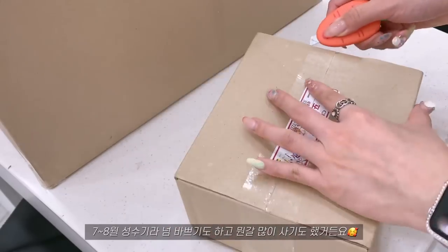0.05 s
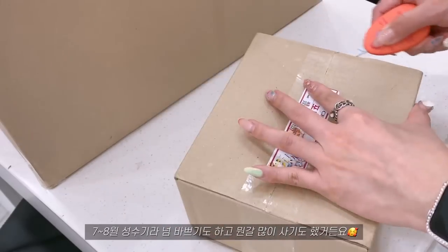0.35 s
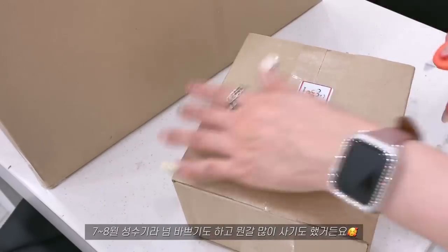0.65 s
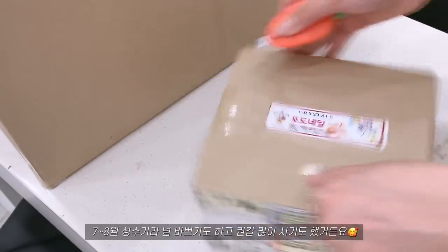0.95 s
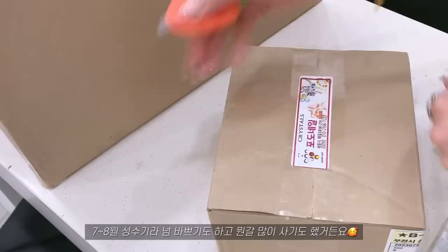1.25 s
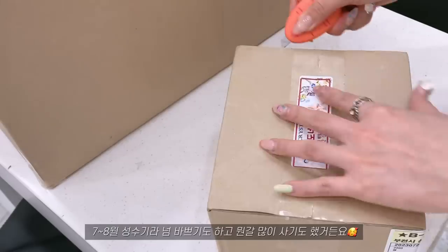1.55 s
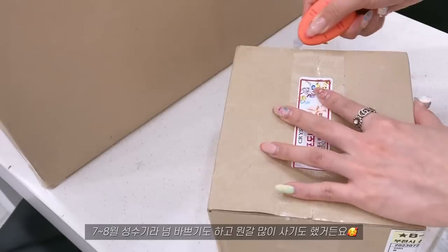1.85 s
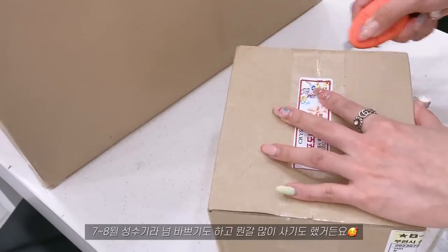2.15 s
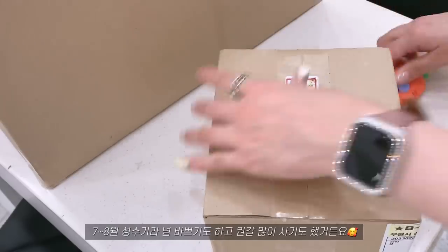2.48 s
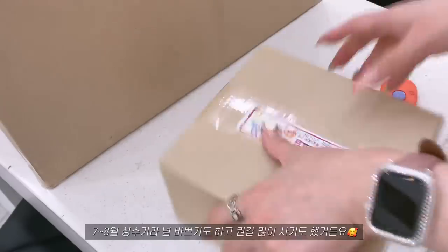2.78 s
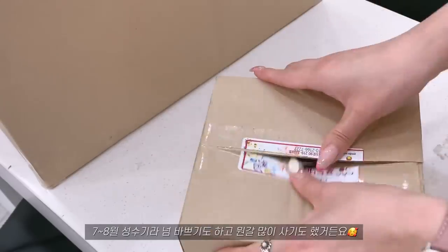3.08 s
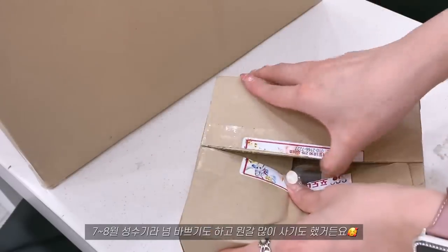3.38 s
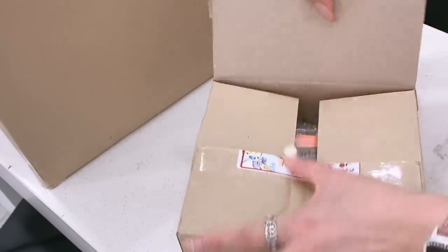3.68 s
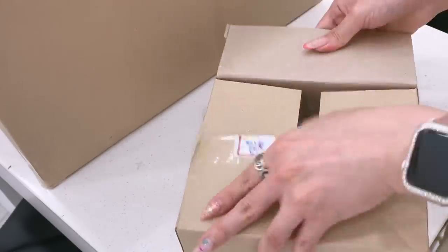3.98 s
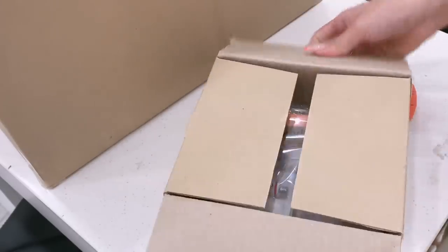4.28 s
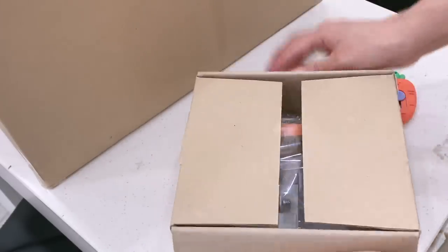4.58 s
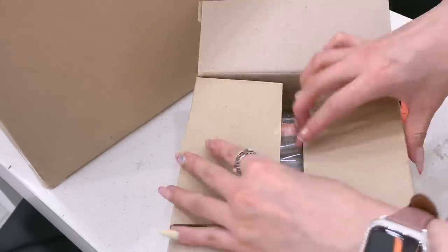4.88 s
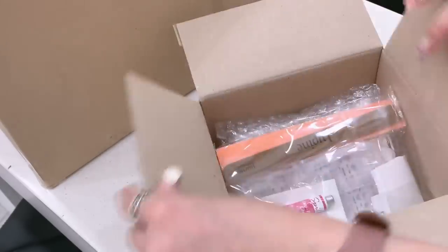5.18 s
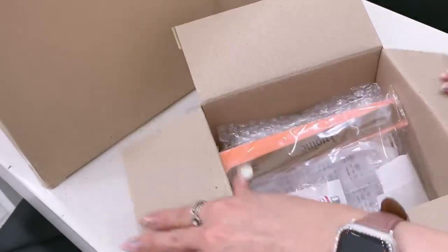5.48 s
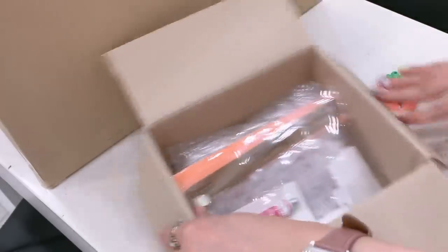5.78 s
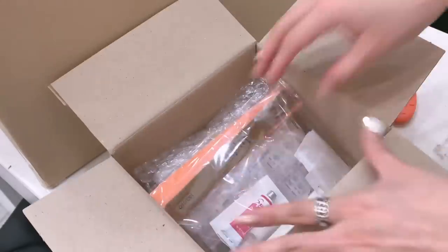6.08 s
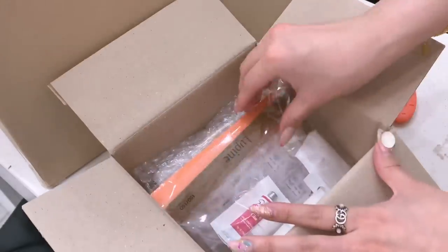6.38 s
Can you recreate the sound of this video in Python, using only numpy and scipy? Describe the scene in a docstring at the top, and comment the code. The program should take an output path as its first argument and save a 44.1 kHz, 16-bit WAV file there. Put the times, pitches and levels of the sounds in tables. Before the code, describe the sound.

Close, dry sounds of a parcel being opened: tape sawed, a blade clicking back, cardboard sliding and knocking, then crinkling plastic.

```python
"""A small cardboard parcel is opened on a table, close to the microphone, in a dry room.
First a box cutter saws through the tape at one end, then at the other, rasping while the box drones.
Just after two seconds its blade clicks back in. Next the box is turned and slid, and the last tape snaps.
Then the flaps knock and scrape, and at about six seconds fingers crinkle the plastic bag inside."""
import sys
import numpy as np
from scipy import signal
from scipy.fft import rfft, irfft, next_fast_len
from scipy.io import wavfile
from scipy.ndimage import uniform_filter1d, map_coordinates

SR = 44100
rng = np.random.default_rng(int(sys.argv[2]) if len(sys.argv) > 2 else 0)


def transcribe(signal):
    """Save signal, clipped to [-1, 1], as a 16-bit WAV file at the path in sys.argv[1]."""
    frames = np.atleast_2d(signal).T
    limited = np.clip(frames, -1, 1)
    pcm = np.round(limited * 32767).astype(np.int16)
    wavfile.write(sys.argv[1], SR, pcm)


N = 288502
TOP_HZ = 16000  # highest frequency kept
HIT_T = np.arange(SR // 6) / SR  # seconds since the start of one short hit


def amp(db):
    """Turn decibels into a number to multiply by."""
    return 10 ** (np.asarray(db) / 20)


def unit(x):
    """Give a sound an average strength (rms) of 1."""
    return x / np.sqrt(np.mean(x ** 2) + 1e-20)


def pulse(x):
    """Give a hit the energy of 10 ms of sound at strength 1."""
    return x * np.sqrt(SR / 100 / (np.sum(x ** 2) + 1e-20))


def along(points, hz):
    """Read between (frequency, value) points, with octaves evenly spaced."""
    freqs, values = np.transpose(points)
    return np.interp(np.log(hz + 1), np.log(freqs + 1), values)


def add(track, start, sound):
    """Mix a sound into the track, start seconds in."""
    part = track[max(round(start * SR), 0):][:len(sound)]
    part += sound[:len(part)]


def wobble(rate):
    """A smooth random curve through rate points a second."""
    return map_coordinates(rng.standard_normal(int(N * rate / SR) + 4), [np.arange(N) * rate / SR])


def coloured(x, tone):
    """Make each frequency louder or softer, following a tone table of f/Hz, level/dB."""
    size = 2 * next_fast_len(len(x) // 2 + 2048)
    gain = amp(along(tone, np.fft.rfftfreq(size, 1 / SR)))
    # fold the filter so that it rings only after a hit, never before
    cepstrum = irfft(np.log(gain + 1e-6))
    cepstrum[1:size // 2] *= 2
    cepstrum[size // 2 + 1:] = 0
    return irfft(rfft(x, size) * np.exp(rfft(cepstrum)), size)[:len(x)]


def patchy(x, depth_db):
    """Patches of pitch come and go as the touching point moves."""
    spectrum = signal.stft(x, nperseg=1024)[2]
    patches = uniform_filter1d(rng.standard_normal(spectrum.shape), size=5, axis=0)
    patches = uniform_filter1d(patches, size=6, axis=1)
    return signal.istft(spectrum * amp(depth_db * unit(patches)), nperseg=1024)[1][:N]


def slips(rate, spread_db, clump_db, clump_rate, smooth):
    """Friction: clumps of tiny, uneven slips over a smooth rub. Rates are per second."""
    sizes = amp(spread_db * np.clip(rng.standard_normal(N), -2, 2)) * rng.choice([-1, 1], N)
    grains = unit(sizes * (rng.random(N) < rate / SR))
    force = grains + smooth * rng.standard_normal(N)
    return unit(force * amp(clump_db * np.clip(wobble(clump_rate), -2, 2)))


def pings(count, low_hz, high_hz, cycles, spread_db):
    """Tiny buckles at random times, each ringing for a few cycles at its own pitch."""
    when, pitch, size, phase = rng.random((count, 4)).T[:, :, None]
    hz = low_hz * (high_hz / low_hz) ** pitch
    n = np.arange(min(int(3 * cycles * SR / low_hz), 1500))
    turns = hz * n / SR
    strength = amp(spread_db * size ** 3) * hz
    rings = strength * np.sin(2 * np.pi * (turns + phase)) * np.exp(-turns / cycles)
    places = (when * N).astype(int) + n
    return unit(np.bincount(places.ravel(), rings.ravel(), N)[:N])


def burst(fade_s, rise_s, tone):
    """A short crack of noise that falls 60 dB in fade_s; each one has a slightly different tone."""
    envelope = amp(-60 * HIT_T / fade_s) * (1 - np.exp(-HIT_T / rise_s)) ** 2
    hz = np.geomspace(100, TOP_HZ, 48)
    tone_db = along(tone, hz) + 3.5 * np.clip(rng.standard_normal(len(hz)), -2, 2)
    noise = rng.standard_normal(len(HIT_T)) * envelope
    return pulse(coloured(noise, np.transpose([hz, tone_db])))


def strokes(rows, swell_share, drift_db_per_s, fade_lengths):
    """One loudness curve per level column: each stroke swells, drifts, then fades away."""
    t, power = np.arange(N) / SR, 0
    for start, length, *levels_db in rows:
        age = np.maximum(t - start, 0)
        swell = np.sin(np.pi / 2 * np.minimum(age / (swell_share * length), 1)) ** 2
        drift_db = drift_db_per_s * np.minimum(age, length)
        fall_db = -60 * np.maximum(age - length, 0) / (fade_lengths * length)
        power = power + (amp(levels_db)[:, None] * swell * amp(drift_db + fall_db)) ** 2
    return np.sqrt(power)


# tones of the quiet room and of the draught: f/Hz, level/dB
STILL_TONE = [(35, -25.5), (60, -13.5), (130, -21.5), (207, -15.5), (323, -25.5), (1410, -34.5),
              (1740, -38.5), (9790, -47), (14200, -57), (16000, -74)]
DRAUGHT_TONE = [(1, -6), (3, -11), (8, -2), (16, -25.5), (30, -23.5), (60, -32), (120, -63), (300, -84.5)]
def air():
    """Faint room noise, and a slow draught that sways the microphone."""
    still = amp(-55) * unit(coloured(rng.standard_normal(N), STILL_TONE))
    draught = amp(-28.5) * unit(coloured(rng.standard_normal(N), DRAUGHT_TONE))
    return still + draught


# how long the room's echo lasts: f/Hz, time to fall 60 dB/s
ECHO_TIMES = [(150, 0.4), (1000, 0.51), (5000, 0.18), (14000, 0.18)]
def room(x):
    """The walls send back a short, soft echo whose high notes die first."""
    hz, t, noise = signal.stft(rng.standard_normal(SR // 2), SR, nperseg=256)
    fade = amp(-60 * t / along(ECHO_TIMES, hz)[:, None])
    tail = signal.istft(noise * fade, SR, nperseg=256)[1]
    delayed_tail = np.pad(tail / np.linalg.norm(tail), (round(0.0045 * SR), 0))
    return signal.fftconvolve(x, delayed_tail)[:N]


# the whole box bumps the table: t/s, level/dB
LANDINGS = [(2.477, -17), (3.51, -25.5), (4.146, -6.5)]
def bumps():
    """A soft landing gives one low push of air, with no ring."""
    out = np.zeros(N)
    age = HIT_T / 0.0044  # counted in steps of 4.4 ms
    for start, db in LANDINGS:
        add(out, start, amp(db) * age * (age - 2) * np.exp(-age))
    return out


# hands, flaps and the box's bottom drag: t/s, length/s, drone level/dB, scrape level/dB, hiss level/dB
DRAGS = [(0.39, 0.12, -48, -61, -54.5), (0.68, 0.17, -45.5, -53, -45.5), (0.83, .12, -47, -49.5, -43.5),
         (0.98, .075, -54, -55, -40), (1.47, 0.13, -57, -66, -62.5), (2.19, 0.052, -48, -45, -53),
         (2.41, 0.23, -46, -43, -48), (2.63, 0.26, -37.5, -48.5, -48), (2.98, 0.12, -35, -34.5, -42),
         (3.22, 0.14, -38, -46, -55), (3.475, .12, -34.5, -37.5, -44.5), (3.63, .06, -34.5, -35.5, -40),
         (3.7, 0.22, -37.5, -39, -45), (3.92, 0.17, -47, -47.5, -44.5), (4.1, 0.15, -36, -37, -39),
         (4.34, 0.073, -41, -47, -53), (4.49, 0.1, -49.5, -50, -48.5), (4.77, 0.3, -44.5, -47.5, -49),
         (5.12, 0.24, -43, -49, -50.5), (5.28, 0.045, -39, -46, -38), (5.38, 0.25, -48.5, -47.5, -52),
         (5.65, 0.16, -48.5, -43.5, -45.5), (5.94, 0.27, -49, -52.5, -49.5)]
# tones of the droning box, its scraping edges and its hissing fibres: f/Hz, level/dB
BOX_TONE = [(47, -56), (80, -12), (117, -2), (172, -8.5), (248, -2.5), (292, -7), (489, -7.5), (672, -6),
            (933, -13.5), (1100, -11.5), (1430, -45), (2420, -120)]
SCRAPE_TONE = [(350, -8), (600, -7), (671, -1), (926, -2), (1070, -8), (1690, -8.5), (1970, -14),
               (3200, -21), (4160, -73), (7040, -120)]
HISS_TONE = [(1180, -23), (2000, -2.5), (2490, 3.5), (3010, -9), (3310, 1), (5120, 0.5), (6360, 1.5),
             (10500, -0.5), (14300, -6), (16000, -7)]
def rubbing():
    """Cardboard drags on the table, on skin and on itself: its walls creak and fine fibres hiss."""
    drone, scrape, hiss = strokes(DRAGS, swell_share=0.22, drift_db_per_s=-7.5, fade_lengths=3)
    coarse = slips(rate=550, spread_db=6.5, clump_db=6, clump_rate=60, smooth=0.86)
    fine = slips(rate=4500, spread_db=1.5, clump_db=3, clump_rate=60, smooth=1.15)
    creaks = pings(count=1300, low_hz=98.5, high_hz=814, cycles=4.6, spread_db=13)
    walls = unit(unit(coloured(creaks, BOX_TONE)) + 0.84 * unit(coloured(coarse, BOX_TONE)))
    edge = unit(patchy(coloured(coarse, SCRAPE_TONE), depth_db=1.5))
    fibres = unit(patchy(coloured(fine, HISS_TONE), depth_db=2.9))
    return drone * walls + scrape * edge + hiss * fibres


# short squeaks: middle t/s, length/s, f/Hz, level/dB
SQUEAKS = [(0.325, 0.012, 4200, -38), (0.355, 0.0096, 480, -21), (0.386, 0.022, 417, -40),
           (2.112, 0.017, 5140, -39.5), (2.169, 0.016, 454, -32.5), (2.485, 0.017, 4620, -38.5),
           (2.563, 0.0091, 1260, -33), (2.688, 0.0056, 1620, -31.5), (2.69, 0.042, 500, -31.5),
           (2.843, 0.036, 1290, -35.5), (4.22, .024, 665, -28.5), (4.6, 0.025, 876, -33.5),
           (4.808, 0.023, 643, -32), (4.907, 0.02, 646, -28.5), (5.163, 0.011, 143, -35),
           (5.222, 0.028, 1230, -39), (5.312, 0.016, 1080, -32.5), (5.316, 0.021, 148, -33),
           (5.714, 0.05, 1590, -42), (5.821, 0.0086, 1097, -29.5), (6.156, 0.031, 430, -34.5)]
def squeaks():
    """A sticking edge slips, swelling and fading around one pitch over a soft hiss of fibres."""
    out, t = np.zeros(N), np.arange(N) / SR
    force = slips(rate=1400, spread_db=4, clump_db=1.8, clump_rate=220, smooth=0.6)
    for middle, length, hz, db in SQUEAKS:
        near = np.abs(t - middle) < 2 * length
        swell = np.exp(-2 * ((t[near] - middle) / length) ** 2)
        tone = [(hz / 4, -30), (hz / 2.05, -12), (hz, 0), (hz * 1.21, -10), (hz * 3, -24), (hz * 9, -55)]
        squeak = unit(coloured(force[near], tone))
        hiss = amp(-21.5) * unit(coloured(force[near], HISS_TONE))
        out[near] += amp(db) * swell * (squeak + hiss)
    return out


# fingers grab the bag: t/s, length/s, drone level/dB, crinkle level/dB
BAG_GRABS = [(6.115, 0.049, -37, -36), (6.22, 0.09, -41.5, -37.5), (6.39, 0.16, -40, -41.5)]
# creases in the tape and the bag flip over: t/s, level/dB
CREASE_SNAPS = [(1.2292, -50.5), (1.412, -58.5), (3.421, -38), (4.261, -40.5), (5.1942, -41.5),
                (5.291, -47), (5.6103, -45.5), (6.125, -34), (6.1848, -29), (6.2781, -30.5), (6.29, -32),
                (6.3107, -40), (6.326, -33), (6.3622, -31.5), (6.4144, -34.5), (6.4241, -30.5),
                (6.51, -32.5), (6.5288, -32)]
# tone of thin plastic: f/Hz, level/dB
PLASTIC_TONE = [(470, -24), (800, -10), (1030, -2.5), (1660, -1.5), (4570, -2.5), (5380, -6.5), (8440, -6),
                (14800, -12.5), (16000, -11.5)]
def plastic():
    """Big creases snap and ring one by one, many small ones rustle, and the bag nudges the box."""
    drone, crinkle = strokes(BAG_GRABS, swell_share=0.15, drift_db_per_s=-6, fade_lengths=4.7)
    crackle = pings(count=9000, low_hz=1200, high_hz=10000, cycles=2.5, spread_db=11)
    force = slips(rate=1300, spread_db=6, clump_db=2.5, clump_rate=90, smooth=0.6)
    rustle = patchy(force, depth_db=2.5)
    out = crinkle * unit(coloured(1.4 * crackle + rustle, PLASTIC_TONE))
    out += drone * unit(coloured(rustle, BOX_TONE))
    ring_shape = amp(-60 * HIT_T / 0.0054) * (1 - np.exp(-HIT_T / 0.00024))
    for start, db in CREASE_SNAPS:
        hz = 4160 * 2 ** (0.47 * rng.standard_normal())  # varies by about half an octave
        ring = pulse(np.sin(2 * np.pi * hz * HIT_T) * ring_shape)
        snap = burst(fade_s=0.014, rise_s=0.00041, tone=PLASTIC_TONE)
        add(out, start, amp(db) * (snap + 0.37 * ring))
    return out


# the cutter's slider jumps over its notches: t/s, level/dB
NOTCHES = [(2.261, -43.5), (2.284, -28.5), (2.2945, -34), (2.3311, -29), (2.349, -35), (2.3897, -35),
           (2.413, -30.5), (2.4223, -32), (2.554, -40.5)]
# tone of one click: f/Hz, level/dB
CLICK_TONE = [(500, -14), (1300, -5), (2200, 4.5), (3300, -4.5), (5200, -1.5), (9000, -5.5), (15000, -20)]
def ratchet():
    """As the blade slides back in, each notch clicks in the cutter's plastic shell."""
    out = np.zeros(N)
    for start, db in NOTCHES:
        add(out, start, amp(db) * burst(fade_s=0.022, rise_s=0.00025, tone=CLICK_TONE))
    return out


# pulls of the blade through the tape: t/s, length/s, drone level/dB, rasp level/dB
PULLS = [(0.07, 0.16, -39.5, -44.5), (0.22, 0.07, -41.5, -51), (0.3, 0.085, -35.5, -38.5),
         (1.66, 0.377, -42.5, -46.5), (2.03, 0.15, -38.5, -41)]
# the blade snags in the tape: t/s, level/dB
SNAGS = [(0.077, -40), (0.2093, -29), (0.4222, -29.5), (1.656, -48), (1.942, -40), (1.9867, -40.5),
         (2.1127, -43), (2.14, -34)]
# tones of the box being cut, of its grain parting and of a snag: f/Hz, level/dB
CUT_BOX_TONE = [(71, -32), (120, -6.5), (188, -12), (323, -5.5), (481, -6.5), (548, -6.5), (669, -6),
                (920, -22.5), (1150, -12.5), (2000, -56), (2600, -38), (4400, -120)]
RASP_TONE = [(900, -6.5), (1700, 5), (2400, -1.5), (3100, -8.5), (4000, 5), (4800, -2), (5500, 0.5),
             (6200, 1.5), (7000, -6), (7700, 3.5), (8400, -2.5), (9400, -5), (13400, -7.5), (16000, -13)]
SNAG_TONE = [(200, 5), (500, 9), (1200, 4), (2000, -3), (4000, 2.5), (8000, -0.5), (15000, -16)]
def blade():
    """The blade saws through tape in quick slips that rasp at the edge and drone in the box."""
    # each pull grows harder until the blade comes free
    drone, rasp = strokes(PULLS, swell_share=0.18, drift_db_per_s=7, fade_lengths=1)
    force = slips(rate=3000, spread_db=8.5, clump_db=3.5, clump_rate=150, smooth=0.45)
    out = drone * unit(patchy(coloured(force, CUT_BOX_TONE), depth_db=3.5))
    out += rasp * unit(patchy(coloured(force, RASP_TONE), depth_db=2.5))
    for start, db in SNAGS:
        add(out, start, amp(db) * burst(fade_s=0.0086, rise_s=0.00081, tone=SNAG_TONE))
    # a quick bounce off the table top makes the sound slightly hollow
    n = np.arange(N)
    bounce = np.interp(n - 0.000727 * SR, n, out)
    return out + 0.12 * bounce


# knocks and snaps: t/s, ring level/dB, favoured f/Hz, clack and crack level/dB compared with the ring
BOX_HITS = [(0.187, -30.5, 300, -13, -7), (0.312, -25, 345, -20, -16), (0.474, -25, 369, -9, -16.5),
            (0.488, -25, 510, -8, -19.5), (0.706, -20, 320, -10.5, -30), (1.47, -29, 148, 0.5, -18),
            (1.512, -37.5, 530, -12, -6), (2.481, -32, 145, -1, -10), (2.807, -22.5, 465, -10.5, -36),
            (2.837, -28, 320, -4, -31), (2.991, -29.5, 312, -15, -16), (3.021, -19, 259, -11, -14),
            (3.037, -26.5, 267, -8, -8), (3.25, -31.5, 490, -18, -20.5), (3.45, -7.5, 376, -5, -14),
            (3.491, -15, 198, -6, -3), (3.731, -23.5, 534, -8.5, -19.5), (3.773, -47, 270, 14.5, 7.5),
            (3.955, -16, 194, -9, -3.5), (4.111, -26.5, 660, -7.5, -10.5), (4.149, -17.5, 105, -35, -40),
            (4.356, -33.5, 770, -4, -4.5), (4.401, -28, 374, -8.5, -26), (4.757, -36, 102, -9.5, -18),
            (4.803, -21, 247, -23, -25.5), (4.819, -26, 247, -20, -32), (5.012, -25.5, 139, -5, -17.5),
            (5.879, -28.5, 302, -22, -20.5), (6.031, -33, 108, -9.5, -24)]
# notes of the cardboard panels and the air between them: f/Hz, level/dB, time to fall 60 dB/s
PANEL_NOTES = [(83, -19, 0.055), (146, -1, 0.034), (197, -2, 0.018), (256, -3, 0.07), (329, 3.5, 0.077),
               (374, -5.5, 0.2), (486, 9.5, 0.054), (538, -2, 0.14), (627, 12, 0.023), (740, 3, 0.15)]
# tones of the dull clack and the bright crack: f/Hz, level/dB
CLACK_TONE = [(400, -8.5), (750, -1.5), (1000, -9), (1230, -5), (1700, -11.5), (2450, -17.5), (3200, -32),
              (8000, -37.5)]
CRACK_TONE = [(900, -40), (2000, -5.5), (2500, 10), (2950, 4.5), (3500, 5), (4500, -1), (5500, 3),
              (9000, -3), (15000, -18)]
def knocks():
    """The cardboard cracks and clacks, then its panels ring; the spot hit decides which ring most."""
    out = np.zeros(N)
    hz, note_db, fade_s = np.transpose(PANEL_NOTES)[:, :, None]
    # the ring builds quickly, and the hand on the box soon muffles it
    grip = (1 - np.exp(-HIT_T / 0.0008)) * amp(-60 * HIT_T / 0.08)
    for start, ring_db, favoured_hz, clack_db, crack_db in BOX_HITS:
        octaves_away = np.abs(np.log2(hz / favoured_hz))
        strength = amp(note_db + 3.4 * rng.standard_normal(hz.shape) - 22.6 * octaves_away)
        bent_hz = hz * np.exp(0.017 * rng.standard_normal(hz.shape))  # pressure changes the stiffness
        phase = rng.uniform(0, 1.5 * np.pi, hz.shape)
        notes = strength * np.sin(2 * np.pi * bent_hz * HIT_T + phase) * amp(-60 * HIT_T / fade_s)
        add(out, start + 0.00098, amp(ring_db) * pulse(notes.sum(0) * grip))
        add(out, start, amp(ring_db + clack_db) * burst(fade_s=0.015, rise_s=0.00054, tone=CLACK_TONE))
        add(out, start, amp(ring_db + crack_db) * burst(fade_s=0.0056, rise_s=0.003, tone=CRACK_TONE))
    return coloured(out, [(45, -12), (130, 0.5)])  # small panels give off little bass


def scene():
    """Mix it all into one channel; everything is within arm's reach, so the echo is weak."""
    hits = knocks() + ratchet()
    handling = blade() + rubbing() + squeaks() + plastic()
    echo = room(amp(-13.5) * hits + amp(-12) * handling)
    return (hits + handling + bumps() + echo + air())[None]


def record(dry):
    """Flatten any peak beyond full scale, then remove everything above TOP_HZ."""
    clipped = np.clip(dry, -1, 1)
    size = next_fast_len(N + SR // 2)
    kept = np.fft.rfftfreq(size, 1 / SR) < TOP_HZ
    return irfft(rfft(clipped, size) * kept, size)[:, :N]


dry = scene()
out = record(dry)
transcribe(out)
```